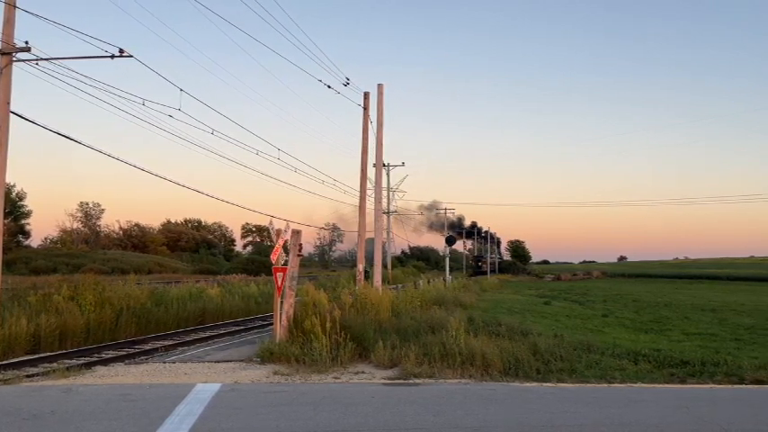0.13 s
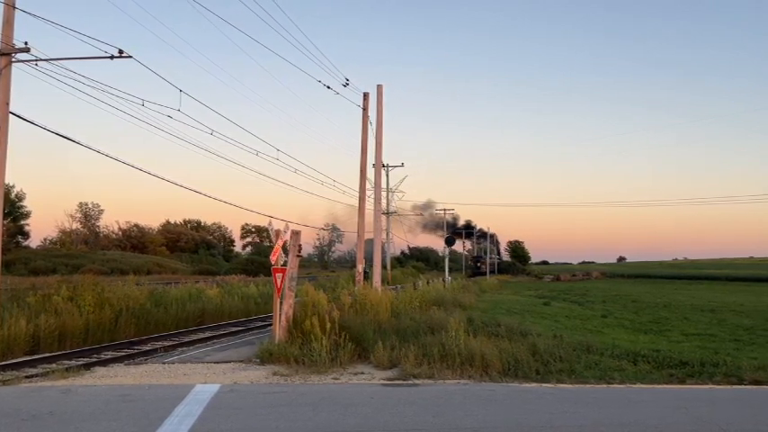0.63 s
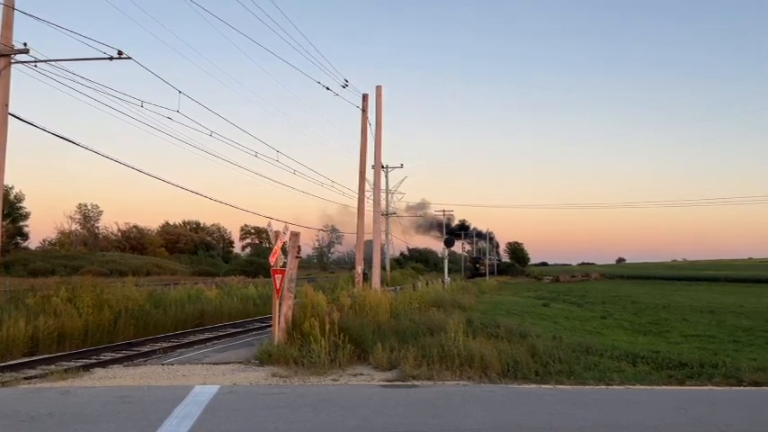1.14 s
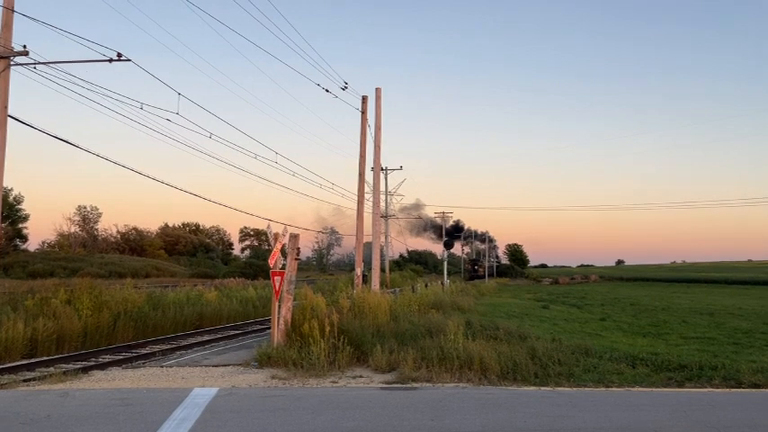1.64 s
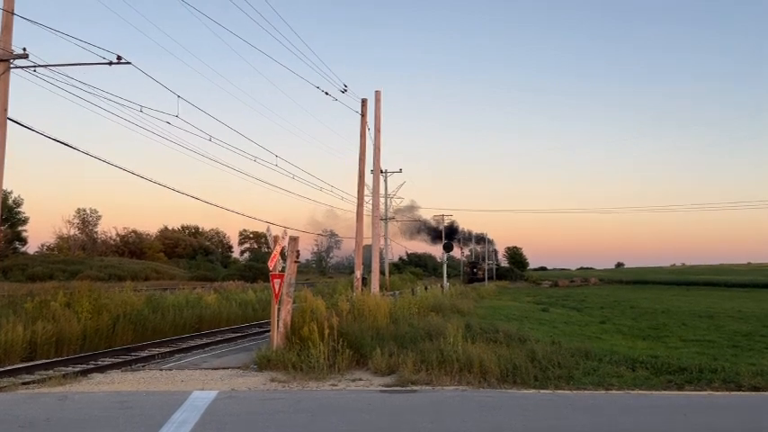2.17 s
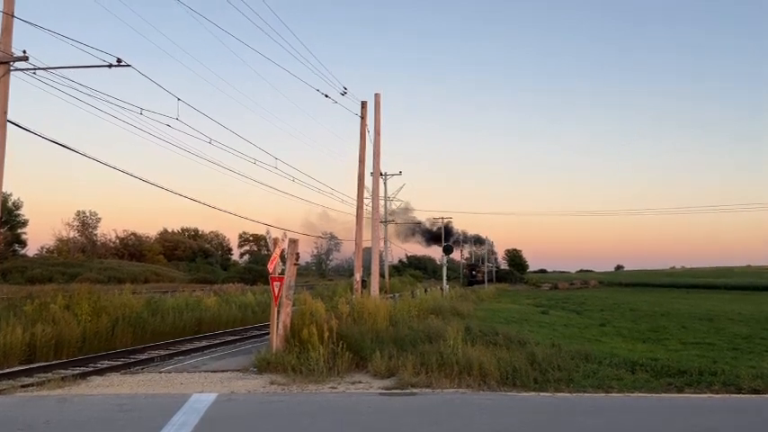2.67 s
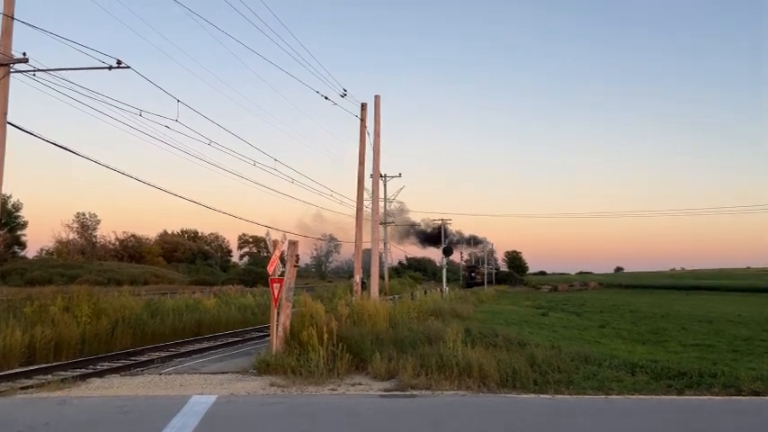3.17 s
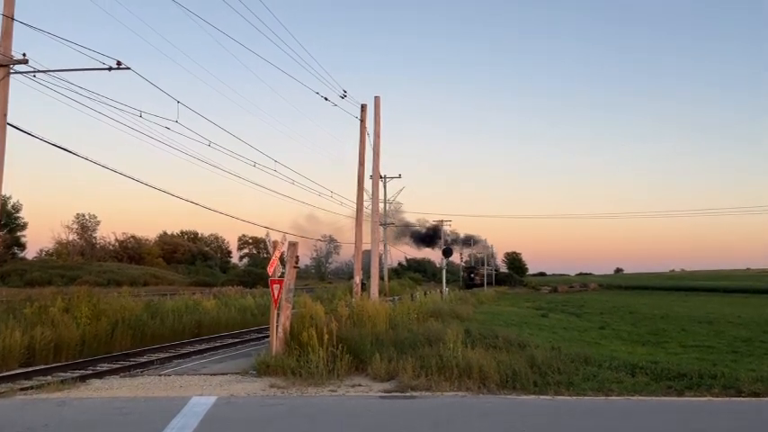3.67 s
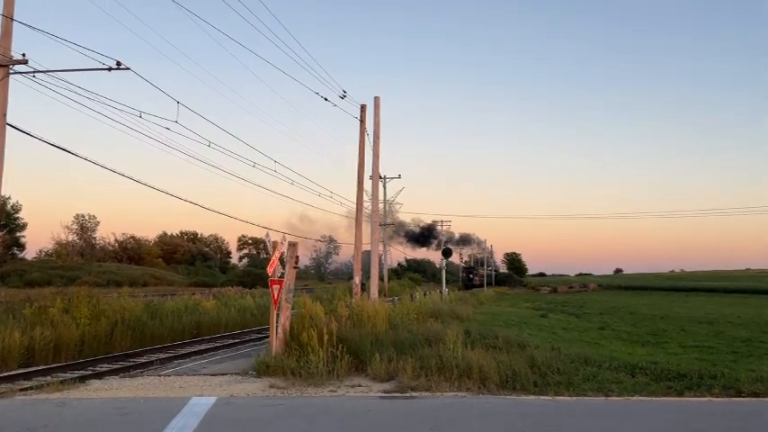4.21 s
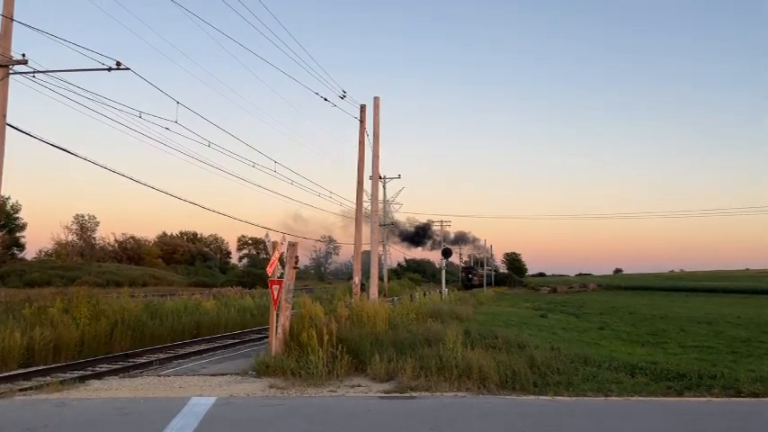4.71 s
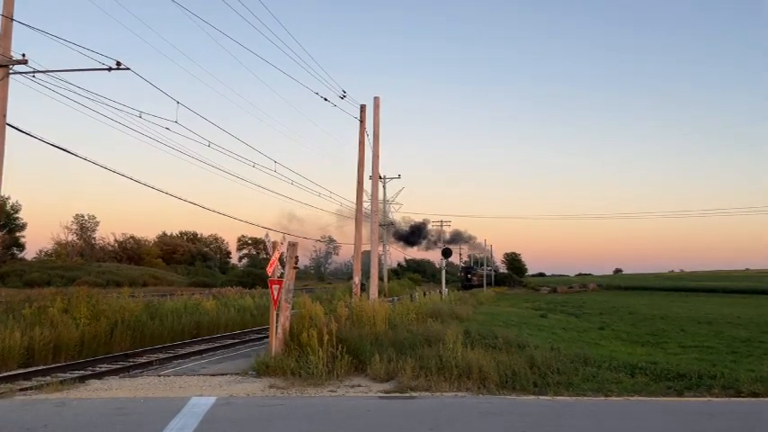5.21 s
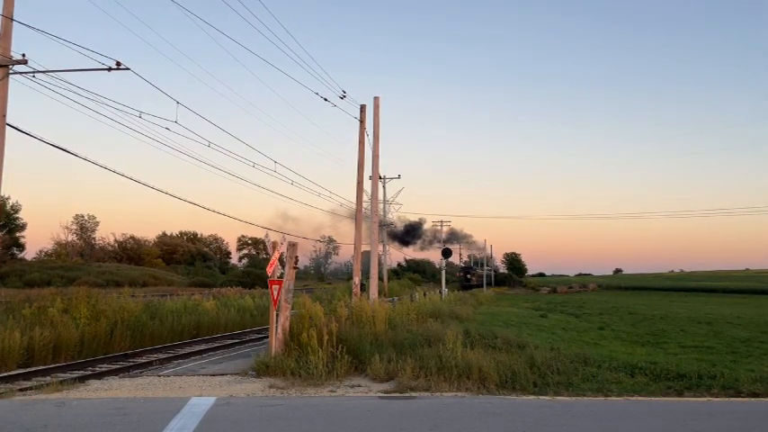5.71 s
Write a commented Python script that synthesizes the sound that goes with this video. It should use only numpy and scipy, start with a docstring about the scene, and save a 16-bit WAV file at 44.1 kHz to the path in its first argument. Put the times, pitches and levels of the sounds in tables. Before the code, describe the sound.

Outdoors in open farmland, a distant steam engine pulls away with regular hoarse chuffs, about three per second, quickening slightly and fading. Soft airy hiss and high throbbing insect bands continue underneath. Breeze rumbles and thumps directly on a handheld stereo phone microphone, hardest around one to two seconds, then calmer. A very faint thin squeal appears near the end.

```python
"""Open fields at dusk: a soft country hiss and throbbing insect bands run throughout.
Breeze rumbles on a phone's two microphone ports; eddies buffet them as short swings of sinking pitch.
From 0.13 s a distant steam locomotive pulls away: each exhaust beat sends shaped noise up the chimney,
with a scattered tail and a faint echo. From 5.53 s two thin sine lines squeal and glide together."""
import sys
import numpy as np
from scipy import signal
from scipy.fft import rfft, irfft
from scipy.io import wavfile
from scipy.ndimage import uniform_filter1d

SR = 44100
rng = np.random.default_rng(int(sys.argv[2]) if len(sys.argv) > 2 else 0)


def voltage_ratio(level):
    """Linear amplitude factor for a level in decibels (scalar or array-like)."""
    return 10 ** (np.asarray(level, float) / 20)


def waveform_to_disk(signal):
    """Save audio, clipped to [-1, 1], as 16-bit WAV at the path in sys.argv[1]."""
    frames = np.transpose(np.atleast_2d(signal))
    scaled = np.clip(frames, -1, 1) * 32767
    samples = np.round(scaled).astype(np.int16)
    wavfile.write(sys.argv[1], SR, samples)


N = 257544
T = np.arange(N) / SR
HZ = np.maximum(np.arange(N // 2 + 1) * SR / N, 1)


def unit(x):
    """Scales to rms 1."""
    return x / np.sqrt(np.mean(x ** 2))


def noise(gain, channels=1):
    """Gaussian noise with the given gain at every frequency."""
    white = rng.standard_normal((channels, N))
    return irfft(rfft(white) * gain, N)


def slope(hz, db):
    """Gain through points joined on a log-frequency axis."""
    return voltage_ratio(np.interp(np.log(HZ), np.log(hz), db, left=-90, right=-90))


def humps(modes):
    """Gain of steep resonances added in power."""
    power = 0
    for hz, width_hz, db in modes:
        detune = 2 * (HZ - hz) / width_hz
        power = power + (voltage_ratio(db) / (1 + detune ** 2)) ** 2
    return np.sqrt(power)


def walk(rate_hz):
    """Random levels held 1 / rate_hz s and smoothed twice; rms 1."""
    hold = int(SR / rate_hz)
    steps = np.repeat(rng.standard_normal(N // hold + 1), hold)
    smooth = uniform_filter1d(uniform_filter1d(steps, hold), hold)
    return unit(smooth[:N])


def ports(mid, side):
    """Left and right from what the ports share and what they oppose."""
    return np.array([mid + side, mid - side])


# country hiss spectrum, relative density: pitch_hz, in_phase_db_per_hz, out_of_phase_db_per_hz
FIELD_SPECTRUM = [(150, -24.5, -30), (300, -8, -10), (660, 0, -7), (1070, -4, -8.5), (1650, -6.5, -9.5),
                  (2040, -4, -22), (3120, -9, -18), (5200, -12.5, -11.5), (6870, -24.5, -16.5),
                  (7300, -15, -12.5), (10270, -14, -68), (10230, -32.5, -23.5), (14100, -34.5, -38),
                  (15700, -21, -16)]
FIELD_DB = -62


def field():
    """Smooth distant hiss: spectrally shaped noise that drifts a little."""
    hz, mid_db, side_db = np.transpose(FIELD_SPECTRUM)
    mid, side = noise(slope(hz, mid_db))[0], noise(slope(hz, side_db))[0]
    return unit(ports(mid, side)) * voltage_ratio(FIELD_DB + 0.16 * walk(0.17))


# insect choruses: pitch_hz, width_hz (before narrowing), level_db, drift_db_per_s,
# left_minus_right_db, port_likeness (-1 to 1), throb_hz
INSECT_CHORUSES = [(3812, 380, -73, .5, 3.5, 0.59, 71), (4060, 200, -77, 0.5, -1.5, 0.52, 12),
                   (4130, 240, -64, -1, 5, -0.74, 83), (4230, 27, -78, -1.7, 7, 0.42, 21),
                   (5110, 200, -81, 0, 7, 0.73, 38), (5486, 960, -73, -1, 11.5, 0.49, 29),
                   (6630, 120, -88.5, 0.5, -3, 0.29, 76), (7090, 170, -87.5, 0, -19, -.95, 47),
                   (8270, 300, -82.5, 0.5, -4, 0.57, 130), (9290, 150, -83.5, 0, 9.5, 1, 230),
                   (9530, 230, -86.5, 0, -4, 0.9, 51), (10370, 180, -88, 0.5, -7, 0.98, 74)]


def insects():
    """Many singers blur into narrow noise bands that throb and swell."""
    out = 0
    for hz, width_hz, db, drift_db_per_s, pan_db, like, throb_hz in INSECT_CHORUSES:
        band = humps([(hz, width_hz, 0)]) ** 1.75
        mid, side = unit(noise(band, channels=2))
        like = np.clip(like, -1, 1)
        pair = ports(np.sqrt((1 + like) / 2) * mid, np.sqrt((1 - like) / 2) * side)
        throb_cycles = np.cumsum(throb_hz * (1 + 0.0363 * walk(5.4))) / SR
        throb = 1 + 0.33 * np.sin(2 * np.pi * throb_cycles)
        pan = np.array([[pan_db], [-pan_db]]) / 2
        level_db = db + drift_db_per_s * T + 1.45 * walk(4.22) + pan
        out = out + pair * throb * voltage_ratio(level_db)
    return out


# breeze level before its lumps: time_s, level_db
BREEZE_LEVEL = [(0, -44), (.2, -41), (.27, -50.5), (.4, -56), (.9, -45.5), (1.1, -49), (1.27, -41.5),
                (1.36, -40), (1.47, -49.5), (1.6, -40.5), (1.74, -48), (1.9, -42), (2.1, -52.5),
                (2.29, -57.5), (2.64, -51), (3.1, -53.5), (3.87, -61), (4.05, -53.5), (4.55, -57),
                (5.19, -52), (5.4, -57.5), (5.84, -58)]
# rumble and flutter spectra, relative density: pitch_hz, density_db_per_hz
RUMBLE_SPECTRUM = [(25, -43), (45, 4.5), (60, 4.5), (90, -1), (130, -6), (200, -11.5), (300, -34.5)]
FLUTTER_SPECTRUM = [(80, -18), (150, -2.5), (250, -6), (400, -11.5), (600, -16)]
# flutter re rumble at the calm breeze level; dB gained per dB of gust
CALM_DB, CALM_FLUTTER_DB, FLUTTER_GROWTH = -54.5, -13, 0.38


def breeze():
    """Lumpy rumble on the ports, with a higher flutter that grows faster in the gusts."""
    s, db = np.transpose(BREEZE_LEVEL)
    flutter_db = CALM_FLUTTER_DB + FLUTTER_GROWTH * (db - CALM_DB)
    lumps, out = walk(16), 0
    for spectrum, rel_db in ((RUMBLE_SPECTRUM, 0), (FLUTTER_SPECTRUM, np.interp(T, s, flutter_db))):
        mid, side = unit(noise(slope(*np.transpose(spectrum)), channels=2))
        level_db = rel_db + 3.43 * lumps + 2.0 * walk(40)
        out = out + voltage_ratio(level_db) * ports(mid, voltage_ratio(-10.0) * side)
    return out * voltage_ratio(np.interp(T, s, db))


# strong eddies: centre_s, level_db, centre_pitch_hz, fall_oct (each side of centre, scaled by 1.2 tanh)
STRONG_EDDIES = [(0.018, -38, 220, 0.43), (0.056, -34.5, 150, 0.14), (0.091, -37, 124, 0),
                 (0.175, -32, 95, 0.2), (0.209, -38.5, 196, .2), (0.255, -41, 119, .2),
                 (0.287, -32.5, 72, .1), (0.977, -26.5, 105, 1.6), (1.045, -31, 79.4, .6),
                 (1.181, -45, 66.6, -.1), (1.308, -32.5, 233, 0), (1.328, -22.5, 150, .4),
                 (1.337, -25, 300, 0), (1.354, -22.5, 106, 0.12), (1.378, -26.5, 289, 0),
                 (1.387, -26.5, 136, .4), (1.416, -37.5, 66, 0), (1.498, -40, 132, 0.16),
                 (1.52, -36, 70, 0.19), (1.611, -33, 79.6, 0), (1.652, -29.5, 264, 0.079),
                 (1.681, -34, 110.5, 1.33), (1.8, -36.5, 107, -.4), (1.841, -39, 200, .9),
                 (1.869, -25, 96, 0.4), (2.067, -35.5, 114.4, 1.05), (2.489, -41.5, 83, .3),
                 (2.713, -40.5, 71, 0.12), (2.789, -40, 96.5, .1), (3.069, -44.5, 82.5, .7),
                 (3.203, -46.5, 78, -0.38), (3.251, -42.5, 78, 0.33), (3.428, -43.5, 117, 0.97),
                 (3.875, -44.5, 67, -.2), (3.921, -44.5, 90, .1), (4.062, -46, 79, 0.56),
                 (4.259, -45.5, 79, 0.16), (4.76, -43, 92, .6), (4.944, -45, 83, -.6),
                 (5.144, -38.5, 81, .4), (5.304, -41.5, 85, 1.1), (5.753, -42, 88.6, 1.27)]
# lesser eddies; level re breeze
SMALL_PER_S, SMALL_DB, SMALL_SPREAD_DB = 6, 3, 2
SMALL_HZ, SMALL_SPREAD_OCT = 90, 0.42
SWING_S, SWING_LAW = 0.016, 0.743  # time scale at 100 Hz; power of pitch by which higher ones are shorter
DRAG_PER_OCT = 0.353  # share by which an eddy lasts longer per unit of fall_oct, either sign


def eddy_rows():
    """The strong eddies, then lesser ones at chance moments, as strong as the breeze allows."""
    count = int(SMALL_PER_S * N / SR)
    spot, size, tone, fall = rng.standard_normal((count, 4)).T
    s = (np.arange(count) + 0.5 + 0.4 * spot) / SMALL_PER_S
    db = np.interp(s, *np.transpose(BREEZE_LEVEL)) + SMALL_DB + SMALL_SPREAD_DB * size
    hz = SMALL_HZ * 2 ** (SMALL_SPREAD_OCT * tone)
    fall_oct = 0.293 + 0.4 * fall
    return STRONG_EDDIES + list(zip(s, db, hz, fall_oct))


def eddies():
    """Each eddy rolls over the ports as a few swings whose pitch glides, mostly down."""
    out = np.zeros((2, N))
    rows = eddy_rows()
    chance = rng.standard_normal((len(rows), 4))
    for (s, db, hz, fall_oct), (turn, skew, lean, swirl_turn) in zip(rows, chance):
        length_s = SWING_S * (100 / hz) ** SWING_LAW * (1 + DRAG_PER_OCT * abs(fall_oct))
        t = (T - s) / length_s
        span = np.abs(t) < 3
        t = t[span]
        pitch_hz = hz * 2 ** (-fall_oct * 1.2 * np.tanh(t))
        phase = 2 * np.pi * np.cumsum(pitch_hz) / SR + 3 * turn
        # one that slows sharply also strikes sharply
        slowing = max(fall_oct, 0)
        rise = 0.41 / (1 + 0.96 * slowing)
        late = t + 0.42 * slowing
        swell = voltage_ratio(db) * np.exp(-(late / np.where(late < 0, rise, 0.8)) ** 2)
        # a slower swirl rolls under it; the ports meet both slightly out of step
        for ear, sign in enumerate((1, -1)):
            lag = 0.31 * sign * skew
            swirl = 0.66 * np.cos(0.55 * phase + lag + 3 * swirl_turn)
            out[ear, span] += swell * voltage_ratio(0.96 * sign * lean) * (np.cos(phase + lag) + swirl)
    return out


RISE_S, FALL_S, TAIL_S, ECHO_S = 0.031, 0.037, 0.081, 0.12
TAIL_OVER_ECHO_DB = 15  # gain before the tail's own build-up and decay


def blast(t, scatter_db):
    """Pressure: valve snaps open, then it falls; fields and trees send back a tail and one echo."""
    after = np.maximum(t, 0)
    rise = np.exp(-np.abs(t / RISE_S) ** 3)
    fall = np.exp(-(after / FALL_S) ** 1.3)
    direct = np.where(t < 0, rise, fall)
    build_up = 1 - np.exp(-after / FALL_S)
    tail = voltage_ratio(scatter_db + TAIL_OVER_ECHO_DB) * np.exp(-after / TAIL_S) * build_up
    echo = voltage_ratio(scatter_db) * np.exp(-((t - ECHO_S) / RISE_S) ** 2)
    return direct + tail + echo


# exhaust beats: peak_s, roar_db, ring_re_roar_db, rasp_re_roar_db, scatter_re_blast_db (in pressure)
BEATS = [(0.131, -47.5, -12.5, -12.5, -29), (0.49, -49, -10, -6, -27), (0.869, -43, -7, -10, -43),
         (1.222, -45, -8, -10.5, -26), (1.57, -47.5, -12.5, -12.5, -30), (1.913, -49.5, -15.5, -10.5, -39),
         (2.27, -44.5, -11, -10, -40), (2.593, -46.5, -4, -5.5, -28), (2.915, -50.5, -13.5, -6.5, -20.5),
         (3.241, -54, -7, -3.5, -34), (3.576, -49.5, -8, -7.5, -35), (3.891, -49.5, -10.5, -6, -36.5),
         (4.194, -52, -12, -7, -39), (4.499, -52.5, -14, -7.5, -41), (4.811, -50.5, -9, -9, -28),
         (5.118, -51, -5.5, -0.3, -33), (5.406, -52.5, -8.5, -9, -24.5), (5.69, -53.5, -9.5, -5.5, -21)]
# what the blast excites, grouped as roar, chimney ring, rasp, hiss: pitch_hz, width_hz, level_db
BLAST_MODES = [
    [(300, 920, 2.5), (557, 213, -2), (650, 560, -6), (970, 108, -8)],
    [(1271, 210, -1.5), (1412, 62, 3), (1528, 73, 0)],
    [(1824, 320, -3), (2000, 580, -4), (2307, 170, -6)],
    [(2757, 360, -2.5), (3304, 410, -3), (3910, 1420, -3.5), (4700, 650, -9.5), (5470, 520, -18.5)],
]
# how early each group peaks: lead_ms
GROUP_LEAD_MS = [0, 9, 3, 0]
# ring and roar need a harder blast: power of the pressure that drives each group
GROUP_SHARPNESS = [1.147, 1.13, 0.87, 0.94]
# four strokes of one wheel turn: hiss_re_roar_db
STROKE_HISS = [-12, -8.5, -11, -14]
# train heard from slightly right: pitch_hz, opposed_part_db, opposed_phase_rad
TRAIN_BEARING = [(200, -11, -1.5), (710, -26.5, -3.5), (1320, -13.5, -1.5), (1800, -15.5, -2.5),
                 (2600, -35, 5), (3600, -37, 0), (4800, -11, 1), (5600, 6, -2), (7000, 12, -1.5)]
AIR_DB_PER_S = 0.22  # loss at 4 kHz as the train draws away; grows as pitch squared


def locomotive():
    """Turbulent steam rings the chimney at every beat; moving air recolours each one."""
    s, roar_db, ring_db, rasp_db, scatter_db = np.transpose(BEATS)
    hiss_db = np.resize(STROKE_HISS, len(s))
    pressure = np.array([blast(T - peak_s, db) for peak_s, db in zip(s, scatter_db)])
    groups = zip(BLAST_MODES, GROUP_LEAD_MS, GROUP_SHARPNESS, (0 * s, ring_db, rasp_db, hiss_db))
    churn, near, spread = walk(70), 0, 0
    for modes, lead_ms, sharpness, group_db in groups:
        drive = pressure ** sharpness
        for hz, width_hz, db in modes:
            colour_db = 1.6 * rng.standard_normal(len(s))
            air_db = AIR_DB_PER_S * s * (hz / 4000) ** 2
            beat_gain = voltage_ratio(roar_db + group_db + colour_db - air_db)
            puffs = np.interp(T + lead_ms / 1000, T, beat_gain @ drive)
            puffs = puffs * voltage_ratio(db + 1.6 * churn + 1.3 * walk(60))
            mid, side = unit(noise(humps([(hz, width_hz, 0)]), channels=2))
            near = near + puffs * mid
            spread = spread + puffs * side
    hz, opposed_db, phase_rad = np.transpose(TRAIN_BEARING)
    turn = np.exp(1j * np.interp(np.log(HZ), np.log(hz), phase_rad))
    opposed = irfft(rfft(near) * slope(hz, opposed_db) * turn, N)
    return ports(near, opposed + voltage_ratio(-18.5) * spread)


# thin wavering squeal: time_s, pitch_hz, level_db, partner_db (partner at 5/4 of the pitch)
SQUEAL_GLIDE = [(5.53, 2160, -95, -85), (5.565, 2170, -78, -67), (5.63, 2215, -69, -65),
                (5.655, 2260, -74, -68), (5.67, 2420, -63, -72), (5.71, 2440, -65, -72),
                (5.735, 2360, -78, -74), (5.755, 2315, -62, -73), (5.84, 2280, -62, -75)]


def squeal():
    """Two faint sine lines, 5/4 apart in pitch, that glide and waver together."""
    s, hz, db, partner_db = np.transpose(SQUEAL_GLIDE)
    pitch_hz = np.interp(T, s, hz) * (1 + 0.001 * walk(40))
    phase = 2 * np.pi * np.cumsum(pitch_hz) / SR
    tone = np.sin(phase) * voltage_ratio(np.interp(T, s, db, left=-140))
    partner = np.sin(5 / 4 * phase) * voltage_ratio(np.interp(T, s, partner_db, left=-140))
    return (tone + partner) * voltage_ratio(1.2 * walk(30))


def scene():
    """All sources at the two ports."""
    return field() + insects() + breeze() + eddies() + locomotive() + squeal()


def low_pass(x):
    """Removes everything above the highest recorded frequency."""
    return signal.sosfilt(signal.butter(12, 16750, fs=SR, output="sos"), x)


def record(dry):
    """The phone cuts the deepest bass, below 35 Hz."""
    bass_cut = signal.butter(2, 35, "high", fs=SR, output="sos")
    mix = signal.sosfilt(bass_cut, dry)
    return low_pass(mix)


dry = scene()
out = record(dry)
waveform_to_disk(out)
```